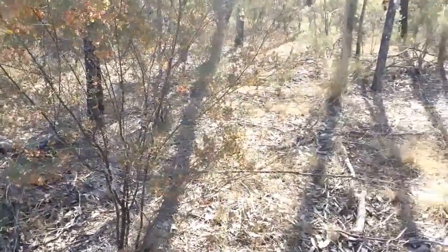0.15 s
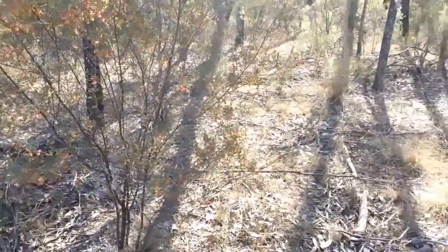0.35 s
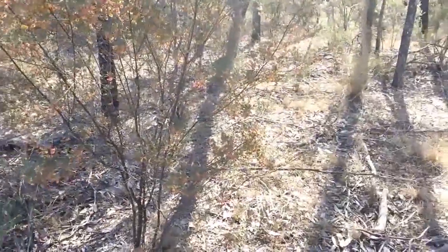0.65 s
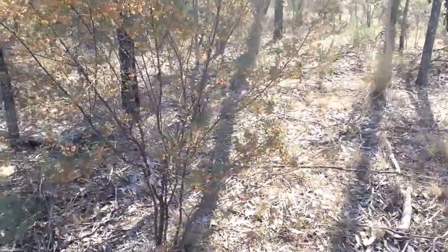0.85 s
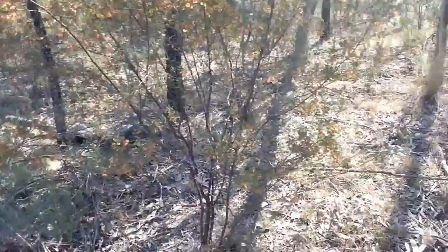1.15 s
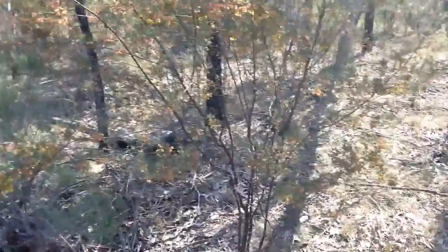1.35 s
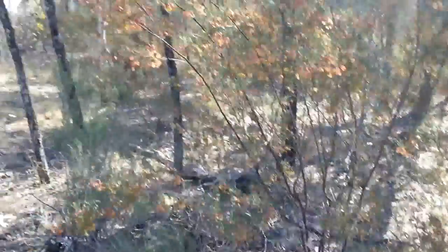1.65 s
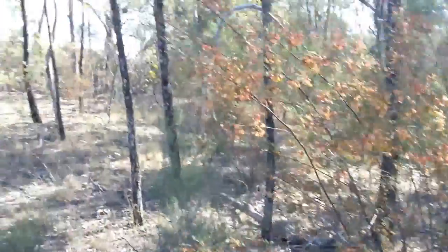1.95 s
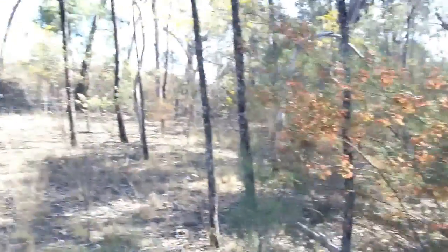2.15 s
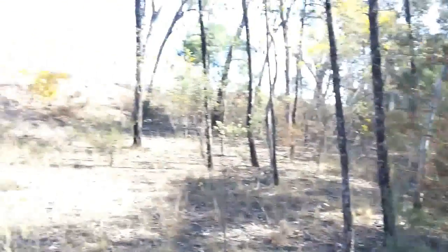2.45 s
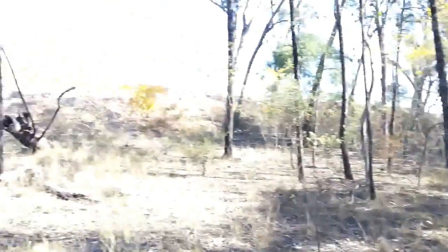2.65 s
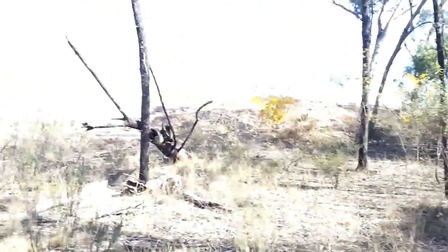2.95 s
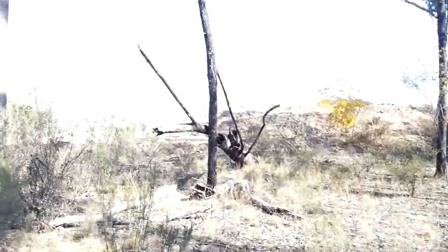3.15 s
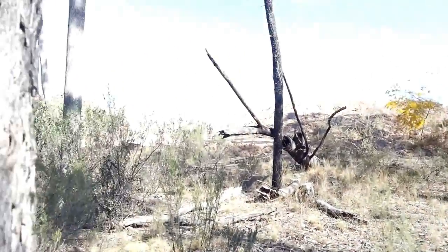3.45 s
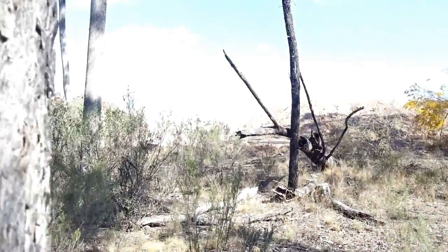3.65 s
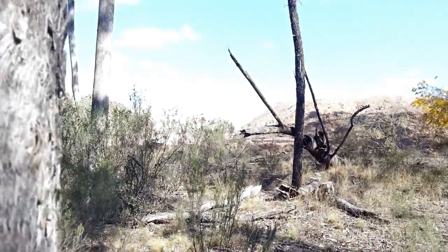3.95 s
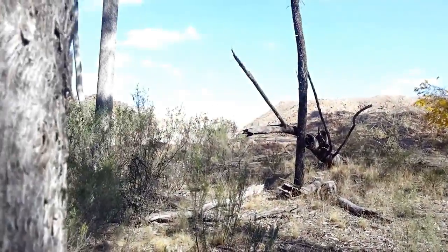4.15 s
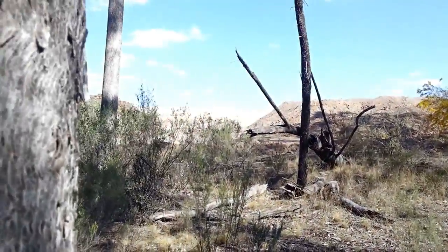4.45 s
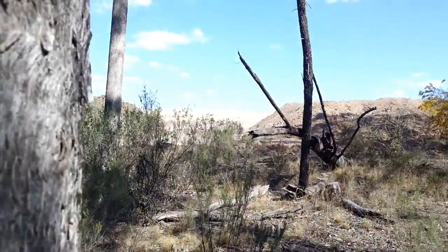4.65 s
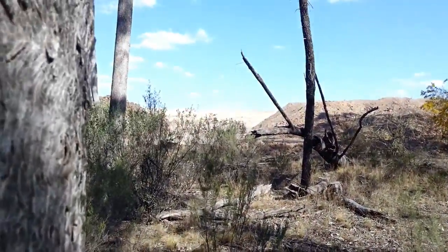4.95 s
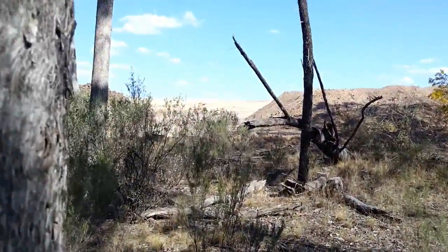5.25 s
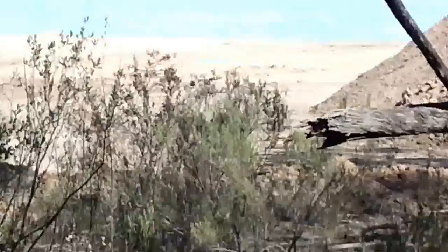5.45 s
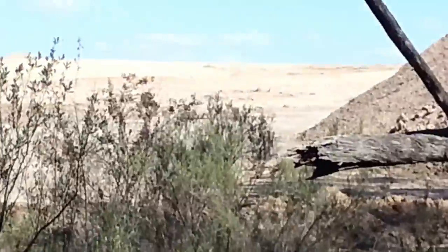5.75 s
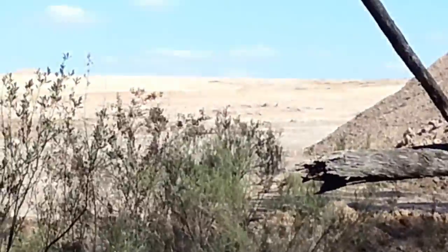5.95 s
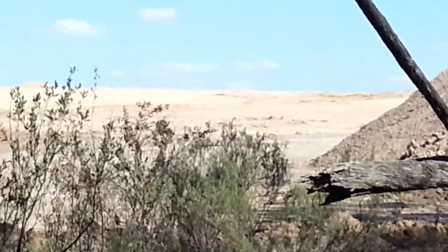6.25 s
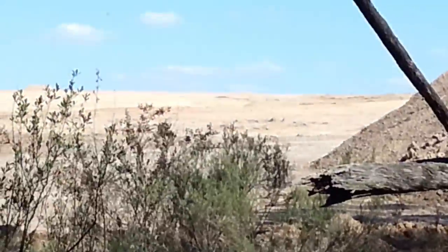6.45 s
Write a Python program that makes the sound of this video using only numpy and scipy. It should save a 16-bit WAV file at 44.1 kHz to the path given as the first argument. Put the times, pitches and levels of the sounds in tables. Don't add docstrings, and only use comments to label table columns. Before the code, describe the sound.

Small birds whistle and chirp in quiet dry woodland while someone a few steps away crunches through leaf litter, snapping twigs and sticks, then stops.

```python
import sys
import numpy as np
from scipy import signal
from scipy.fft import rfft, irfft, next_fast_len
from scipy.io import wavfile
from scipy.ndimage import uniform_filter1d, map_coordinates

SR = 44100
rng = np.random.default_rng(int(sys.argv[2]) if len(sys.argv) > 2 else 0)


def file_out(sig):
    cols = np.atleast_2d(sig).T
    lim = np.clip(cols, -1, 1)
    pcm = np.round(lim * 32767).astype(np.int16)
    wavfile.write(sys.argv[1], SR, pcm)


def how_loud(loudness_db):
    steps = np.asarray(loudness_db, float) / 20
    return 10 ** steps


N = 290619


def unit(x):
    return x / np.sqrt(np.mean(x ** 2) + 1e-20)


def along(points, hz):
    point_hz, value = np.transpose(points)
    return np.interp(np.log(hz + 1), np.log(point_hz + 1), value)


def curves(rows):
    s, *columns = np.transpose(rows)
    return [np.interp(np.arange(N) / SR, s, column) for column in columns]


def wobble(rate, size=N):
    knots = rng.standard_normal(int(size * rate / SR) + 4)
    return map_coordinates(knots, [np.arange(size) * rate / SR])


def filtered(x, response):
    m = next_fast_len(x.shape[-1] + 8192)
    spectrum = rfft(x, m) * response(np.fft.rfftfreq(m, 1 / SR))
    return irfft(spectrum, m)[..., :x.shape[-1]]


def resonance(hz, width_hz):
    return lambda f: 1j * f * width_hz / (hz * hz - f * f + 1j * f * width_hz)


# start_s, delay_ms
REACH = [(0, .25), (3, .25), (3.5, .41)]


def add(out, s, sound, pan_db, spacing=0):
    reach = np.interp(s, *np.transpose(REACH))
    lag = round(np.clip(-pan_db * spacing, -reach, reach) * SR / 1000)
    waves = np.broadcast_to(sound, (2, sound.shape[-1]))
    for side, wave, db, late in zip(out, waves, (pan_db / 2, -pan_db / 2), (lag, 0)):
        part = side[round(s * SR) + late:][:len(wave)]
        part += how_loud(db) * wave[:len(part)]


# start_s, lag_ms
TURN = [(0, -0.25), (1.2, -0.34), (2.6, -0.17), (3.7, 0.18), (4.2, 0.333), (6.6, 0.3)]


def far(x):
    lag = curves(TURN)[0] * SR / 1000
    left = map_coordinates(x[0], [np.arange(N) - lag], mode="nearest")
    return np.array([left, x[1]])


# pitch_hz, t60_s
TREES = [(500, 1), (3000, 0.62), (10000, 0.78)]


def trees(x, start_s):
    hz, t, z = signal.stft(rng.standard_normal((2, SR // 2)), SR, nperseg=256)
    decay = how_loud(-60 * t / along(TREES, hz)[:, None])
    tail = signal.istft(z * decay, SR, nperseg=256)[1]
    late = np.pad(x.mean(0), (round(start_s * SR), 0))[None]
    return signal.fftconvolve(late, tail / np.linalg.norm(tail[0]), axes=1)[:, :N]


# pitch_hz, level_db per Hz
AIR = [(15, -57), (25, -33.5), (175, -14.5), (240, -10.5), (314, -7), (443, -2.5), (480, -1.5),
       (1290, -1.5), (1390, -3), (1870, -0.5), (3260, -4), (4870, -10), (6520, -15.5), (14500, -17)]
# pitch_hz, likeness
ALIKE = [(60, 0.036), (300, 0.32), (700, 0.6), (1500, 0.487), (3000, 0.036), (7000, 0.019)]
AIR_DB = -49


def air(patchy_db):
    z = signal.stft(rng.standard_normal((2, N)), nperseg=512)[2]
    field = uniform_filter1d(rng.standard_normal(z.shape[1:]), 6, 0)
    field = uniform_filter1d(field, 12, 1)
    pair = signal.istft(z * how_loud(patchy_db * unit(field)), nperseg=512)[1][:, :N]

    def spectrum(hz):
        angle = np.arccos(np.clip(along(ALIKE, hz), -1, 1)) / 2
        return how_loud(along(AIR, hz)) * [np.cos(angle), np.sin(angle)]

    mid, side = filtered(pair, spectrum)
    return how_loud(AIR_DB + 0.69 * wobble(2.5)) * unit(np.array([mid + side, mid - side]))


# start_s, length_s, top_hz, end_drop_hz, level_db
WARBLES = [(0.274, 0.055, 3216, 898.5, -56), (0.325, 0.033, 3050, 496, -65),
           (0.599, 0.054, 3147, 804.3, -59), (0.789, 0.053, 2200, 301.6, -60),
           (0.981, 0.061, 3144, 805, -57.5), (1.092, .045, 2800, 400, -64), (1.19, 0.035, 2612, 500, -59),
           (1.307, 0.0542, 2636, 600, -57.5), (1.647, 0.0572, 2802, 402, -58),
           (2.825, 0.038, 3860, 500, -53), (3.12, 0.063, 3420, 700, -53), (3.429, 0.056, 3294, 393, -49),
           (3.7, 0.047, 3736, 600, -55), (3.745, 0.041, 3288, 498, -54), (3.796, 0.043, 3360, 497, -58),
           (3.841, 0.045, 3310, 496, -51), (3.883, .05, 3280, 400, -62), (4.267, 0.0268, 3750, 403, -63),
           (4.29, 0.0477, 3510, 700, -55.5), (4.339, 0.0464, 3400, 502, -60),
           (6.145, 0.037, 3283, 500, -64), (6.185, 0.0473, 3370, 504.4, -63),
           (6.25, 0.0515, 3107, 400, -65), (1.53, .04, 2650, 302, -61)]
WARBLER_PAN_DB = 7.5


def warbles(shake_hz):
    out = np.zeros((2, N))
    for s, length, top_hz, drop_hz, db in WARBLES:
        u = np.linspace(0, 1, round(length * SR))
        arch = np.where(u < .4, 1 - u / .4, (u - .4) / .6) ** 1.3
        hz = top_hz - drop_hz * arch + shake_hz * wobble(379.6, size=len(u))
        flutter = np.array([wobble(213, size=len(u)) for side in out])
        swell = np.sin(np.pi * u) ** 0.051 * how_loud(db + 7.0 + 2.5 * flutter)
        add(out, s, swell * np.sin(2 * np.pi * np.cumsum(hz) / SR), WARBLER_PAN_DB)
    return out


def glide(hz, db, flutter_db):
    level = how_loud(db + flutter_db * wobble(130))
    fluttering_hz = hz + 8 * flutter_db * wobble(81)
    return level * np.sin(2 * np.pi * np.cumsum(fluttering_hz) / SR)


# start_s, length_s, level_db
THIN = [(3.544, .078, -62.5), (3.703, 0.0203, -55), (3.764, 0.025, -67), (3.834, .03, -55),
        (3.968, 0.046, -57), (4.133, 0.046, -60.5), (4.285, 0.046, -54.5), (4.447, 0.055, -55.5),
        (4.655, 0.07, -63), (4.786, 0.086, -60.5), (4.988, 0.061, -51.5), (5.215, 0.085, -54),
        (5.33, 0.084, -63), (5.495, 0.13, -63), (5.66, 0.096, -64.5), (5.783, 0.14, -59.5),
        (6.083, 0.104, -65)]
# start_s, pitch_hz
THIN_HZ = [(3.3, 4200), (4.3, 4170), (4.5, 4040), (5.25, 3930), (5.75, 3850), (5.775, 3600), (6.2, 3590)]
THIN_HOLD_DB, THIN_EDGE_S, THIN_SAG_HZ = -67.5, 0.018, 30


def thin():
    t = np.arange(N) / SR
    gain = how_loud(THIN_HOLD_DB) * ((t > THIN_HZ[0][0]) & (t < THIN_HZ[-1][0]))
    droop = np.zeros(N)
    for s, length, db in THIN:
        on = (t > s) & (t < s + length)
        gain = np.maximum(gain, how_loud(db) * on)
        droop = droop + on * ((t - s) / length - .5)
    soft = lambda x: uniform_filter1d(x, max(round(THIN_EDGE_S * SR), 1))
    hz = curves(THIN_HZ)[0] - THIN_SAG_HZ * soft(droop)
    return soft(gain) * glide(hz, 0, flutter_db=3.5) * how_loud([[.75], [-.75]])


def whistles(rows, last_over_first, spacing=.085, flutter_db=2.3):
    out = np.zeros((2, N))
    for s, length, first_hz, db, pan_db in rows:
        last_hz = first_hz * last_over_first
        u = np.linspace(0, 1, round(length * SR))
        hz = first_hz + (last_hz - first_hz) * (1 - (1 - u) ** 1.457)
        hz = hz + 8 * flutter_db * wobble(94, size=len(u))
        swell = np.sin(np.pi * u) ** 0.4 * how_loud(db + 8.5 + flutter_db * wobble(135, size=len(u)))
        add(out, s - 0.09 * length, swell * np.sin(2 * np.pi * np.cumsum(hz) / SR), pan_db, spacing)
    return out


# start_s, length_s, first_hz, level_db, left_right_db
DOWNSLURS = [(.98, 0.047, 1700, -58, -6), (1.04, 0.058, 2300, -55, -1.5), (1.25, 0.071, 1600, -62.5, -7),
             (1.742, 0.08, 1726, -55.5, -1.5), (1.972, 0.034, 2150, -52, -2),
             (2.424, 0.05, 2100, -48, -9.5), (2.655, 0.0449, 2130, -46.5, -7), (3.13, 0.0285, 1940, -52, 4),
             (3.652, 0.0537, 2072, -53.5, 6.5), (3.75, .022, 2900, -57, -0.5), (3.85, .043, 2088, -53, 6),
             (4.511, 0.064, 1847, -61.5, -4.5), (4.859, 0.024, 2327, -51.5, -6),
             (5.172, 0.032, 2240, -52.5, -9), (5.832, .05, 1980, -54, -3), (6.268, 0.034, 1790, -58.5, 4)]


def downslurs():
    return whistles(DOWNSLURS, last_over_first=.78)


# start_s, length_s, first_hz, level_db, left_right_db
UPSLURS = [(1.098, 0.0274, 2510, -63, 1), (1.437, .04, 2525, -57, -0.5), (2.862, 0.024, 3294, -55, 12),
           (3.724, 0.058, 1690, -62, -1.5), (4.92, .03, 1820, -70.5, 0), (4.957, 0.063, 2267, -68.5, 17.5),
           (5.331, 0.0435, 2070, -58.5, -8), (5.465, 0.027, 3600, -60, 9), (5.79, 0.016, 1864, -53, -10),
           (6.108, .03, 1700, -62, 4.5), (6.097, 0.055, 5200, -70, 2), (6.113, 0.0257, 3560, -58.5, -1),
           (6.35, 0.064, 1520, -50, 4), (6.41, 0.029, 1788, -51.5, -4.5)]


def upslurs():
    return whistles(UPSLURS, last_over_first=1.075)


# start_s, length_s, pitch_hz, level_db, left_right_db
PIPES = [(.055, 0.063, 4900, -63, 1.5), (.175, 0.047, 4850, -68, 1.5), (.243, 0.034, 3570, -66.5, 5.5),
         (.34, 0.041, 2910, -57.5, 3), (1.27, 0.039, 2850, -64, .5), (1.26, 0.063, 2140, -60, 1.5),
         (1.324, 0.078, 2300, -56, 1), (2.554, 0.031, 4280, -62, 16), (2.813, .024, 3340, -64, 7),
         (4.445, 0.038, 1830, -63, -1.5), (4.655, .025, 2260, -63, 0), (4.736, .03, 2190, -66, 6),
         (5.23, .024, 2270, -58, 3.5), (5.393, 0.0204, 2230, -60, 3), (5.62, 0.07, 3170, -61.5, 2),
         (5.71, .04, 1511, -60, 4.5), (5.808, 0.03, 2000, -57.5, -8), (5.55, .03, 3040, -64, 0.5),
         (1.115, 0.0183, 2750, -61, 0.5), (2.505, 0.0278, 3420, -56.5, -0.5), (2.555, 0.0307, 2095, -57, 0),
         (6.135, 0.032, 4300, -58, -4), (6.215, 0.02, 2936, -57, 1), (6.42, 0.045, 3840, -57, -4),
         (6.412, 0.043, 5720, -70.5, 1.5)]


def pipes():
    return whistles(PIPES, last_over_first=0.98)


def sweep(rows, lead_s=0):
    t = np.arange(N) / SR
    hz, db, pan_db = curves(rows)
    tone = glide(hz, db, flutter_db=1.0) * ((t > rows[0][0]) & (t < rows[-1][0]))
    right = np.roll(tone, round(lead_s * SR))
    return np.array([tone * how_loud(pan_db / 2), right * how_loud(-pan_db / 2)])


# start_s, pitch_hz, level_db, left_right_db
TUMBLE = [
    (.572, 3560, -56, 6),
    (.58, 3500, -47, 6),
    (.592, 3300, -56, 3),
    (.622, 2910, -43, 8),
    (.655, 2560, -48, 6),
    (.69, 1950, -53, -4),
    (.718, 1450, -49, -4),
    (.744, 1270, -55, -2),
    (.775, 1340, -50, -2),
    (.783, 1340, -66, -2),
]


def tumble():
    return sweep(TUMBLE, lead_s=.00021)


# start_s, pitch_hz, level_db, left_right_db
ARCH = [
    (6.46, 4550, -54, -6.5),
    (6.466, 4850, -49, -6.5),
    (6.474, 4930, -48, -6.5),
    (6.482, 4850, -50, -6.5),
    (6.489, 4520, -58, -6.5),
]


def arched_chirp():
    return sweep(ARCH)


# start_s, effort_db
SHUFFLE = [
    (1.3, -90),
    (1.55, -52.5),
    (1.8, -50),
    (2.15, -47),
    (2.55, -47.5),
    (2.75, -57.5),
    (3.2, -48),
    (3.8, -54),
    (4.05, -65),
    (4.68, -72),
]
# peak_s, fade_s, load_db, dryness_db (more hiss, less crunch)
TREADS = [(1.456, 0.0055, -53, 11), (1.89, 0.037, -46, 2), (1.97, 0.056, -59, 18.5),
          (2.035, 0.025, -44, -10), (2.18, 0.052, -54, 14), (2.29, .03, -58, 18), (2.39, 0.037, -60, 14.5),
          (2.6, 0.03, -51, -4), (2.928, 0.0728, -41.5, 10), (3.074, 0.025, -43.5, 8.5),
          (3.1, 0.022, -41, 10), (3.133, .035, -42.5, 8.5), (3.185, .02, -48, 5), (3.21, 0.026, -48.5, -12),
          (3.31, 0.018, -47.5, 11.5), (3.44, 0.041, -50, 7.5), (4.29, 0.092, -53, 4.5),
          (4.53, 0.123, -56.5, 7.5)]
PRESS_S = 0.0235


def load(shuffle_db, tread_db, dry_share):
    t = np.arange(0, N / SR, .001)
    power = how_loud(np.interp(t, *np.transpose(SHUFFLE)) + shuffle_db) ** 2
    for s, fade, db, dryness in TREADS:
        width = np.where(t < s, PRESS_S, fade)
        power = power + how_loud(2 * (db + tread_db + dry_share * dryness)) * np.exp(-((t - s) / width) ** 2)
    return np.interp(np.arange(N) / SR, t, np.sqrt(power))


# over_shuffle_db, over_load_db, share_of_dryness
LAYERS = [
    (-8.5, -2.5, -0.089),
    (-1.5, -1.5, -0.11),
    (-15, -15, 0.73),
    (-12, -14.5, 0.99),
]
LITTER_HZ = [700, 2500, 5000, 9000]
BED = (.75, .78, .7, .88)
LITTER_PAN_DB = [-0.68, 0.017, 1.8, -2.5]
LITTER_SPREAD = [1.9, 1.26, .9, 1.4]


def litter(count, spiky_db, cycles):
    out, t = np.zeros((2, N)), np.arange(200) / SR
    first, last = SHUFFLE[0][0], SHUFFLE[-1][0]
    edge = curves([(first, 0), (first + 0.074, 1), (last - .1, 1), (last, 0)])[0]
    clumps = how_loud(1.4 * wobble(70))
    likeness = (.8, .45, 0.074, 0.037)
    layers = zip(LITTER_HZ, LAYERS, likeness, BED, LITTER_PAN_DB, LITTER_SPREAD)
    for hz, layer, alike, bed, pan_db, spread in layers:
        when, tune, size, place, sign = rng.random((count, 5)).T
        start = ((first + when * (last - first)) * SR).astype(int)
        pitch = np.minimum(hz * 2 ** (1.57 * (tune - .5)), 14500)[:, None]
        grain = how_loud(-spiky_db * np.log(size + 0.014))[:, None]
        grain = grain * how_loud(-20 * t * pitch / cycles) * (1 - t / t[-1])
        grain = grain * np.sin(2 * np.pi * pitch * t) * np.sign(sign - .5)[:, None]
        sides = [place < (1 + alike) / 2, place > (1 - alike) / 2]
        at = (start[:, None] + np.arange(len(t))).ravel()
        crackle = np.array([np.bincount(at, (grain * side[:, None]).ravel(), N)[:N] for side in sides])
        shared, own = rng.standard_normal(N), rng.standard_normal((2, N))
        fine = alike * shared + np.sqrt(1 - alike ** 2) * own
        fine = filtered(fine, lambda f: resonance(hz, spread * hz)(f) ** 2)
        mix = 1.17 * unit(crackle) * np.sqrt(1 - bed ** 2) + bed * unit(fine)
        out += how_loud([[pan_db / 2], [-pan_db / 2]]) * load(*layer) * edge * clumps * mix
    return out


KNOCK_LAG_S = 0.00087


def snap(out, s, db, knock_db, sizzle_db, pan_db, hz, cycles, noisy):
    t = np.arange(SR // 40) / SR
    rise = 1 - np.exp(-t / .0002)
    shared, own = rng.standard_normal(len(t)), rng.standard_normal((2, len(t)))
    burst = rise * how_loud(-60 * t / .004) * (.75 * shared + .66 * own)
    ring = rise * how_loud(-60 * t * hz / cycles) * np.sin(2 * np.pi * hz * t)
    body = lambda f: resonance(np.sqrt(hz * 3000), 3200)(f) * resonance(2600, 4200)(f) ** 2
    crack = noisy * filtered(burst, body)
    sizzle = filtered(own * rise * how_loud(-60 * t / 0.0032), lambda f: resonance(7200, 6500)(f) ** 2)
    knock_hz = 814 - 24 * max(knock_db, 0)
    late = np.maximum(t - KNOCK_LAG_S, 0)
    thump = how_loud(-60 * late / 0.0046) * (1 - np.exp(-late / 0.0012))
    knock = -thump * np.sin(2 * np.pi * knock_hz * late)
    parts = (ring + crack, .3), (sizzle, sizzle_db + 6.0), (knock, knock_db + 0.5)
    total = sum(how_loud(db + level_db) * part / abs(part).max() for part, level_db in parts)
    add(out, s - .0002, total, pan_db)


def ring_cycles(hz):
    return 5.6 + hz / 300


TWIG_SIZZLE_DB = -23

# start_s, crack_db, ring_hz, left_right_db
TWIGS = [(1.452, -35.5, 3950, 16), (1.654, -35, 2300, -2), (1.973, -35, 2540, -1), (2.006, -31.5, 3600, 1),
         (2.285, -33, 5140, 3.5), (2.293, -36.5, 1900, -2), (2.3, -32.5, 5230, 1), (2.389, -35, 5100, 6.5),
         (2.453, -44, 3530, 0), (2.514, -38, 3580, 2.5), (2.555, -35, 2090, 0), (2.671, -37.5, 3500, -2),
         (2.9257, -30, 3690, -1), (2.9262, -28, 1290, -1), (2.946, -29, 3000, -1.5),
         (3.151, -27.5, 4200, 0), (2.3602, -35.5, 2200, 0), (2.2654, -35.5, 1900, 0),
         (2.238, -33, 6500, -1.5), (2.475, -35.5, 5000, 2), (1.885, -30, 3600, 0), (1.8716, -35.5, 5000, 2),
         (3.0845, -31, 6600, -4), (3.1732, -31, 5450, -2), (3.2326, -22, 3300, -2), (3.456, -36, 8500, 0),
         (3.518, -35, 7720, -3), (3.668, -46, 4000, 0), (1.565, -27, 2660, 2), (1.6233, -35, 3900, 2.5),
         (1.6847, -33.5, 2500, -8), (1.7947, -18.5, 1920, -2.5), (1.8473, -19, 2160, -4),
         (1.8775, -24, 2080, -2.5), (1.899, -28.5, 5000, 2), (1.9313, -31, 2730, -1),
         (1.9501, -26, 5070, 4.5), (3.2311, -20, 5160, 10), (3.4194, -23, 2400, -5), (3.4185, -19, 4270, 7),
         (2.108, -28, 3370, 2), (2.1095, -31.5, 4200, 0), (2.173, -29, 6000, 0), (3.482, -28, 3000, 0),
         (2.2355, -26, 2650, 2), (2.3224, -32, 2665, -5), (2.7137, -29, 1800, -2), (2.845, -37, 4100, 5),
         (2.9218, -23, 2066, -2), (3.0085, -21, 2260, -2), (3.5474, -39, 3100, 2), (3.8361, -25.5, 3810, 9),
         (3.8365, -24, 1750, -3.5), (4.4818, -32.5, 3600, 17), (4.511, -36, 2180, 11)]


def twigs():
    out = np.zeros((2, N))
    for s, db, hz, pan_db in TWIGS:
        snap(out, s, db, -13.5, TWIG_SIZZLE_DB, pan_db, hz, ring_cycles(hz), noisy=2.4)
    return out


# start_s, crack_db, ring_hz, left_right_db
POPS = [(2.0554, -15, 2100, 1), (2.1868, -22, 2050, -3), (2.1341, -24.5, 3200, -3), (1.9868, -25, 4600, 2),
        (3.2354, -16.5, 1560, -7), (3.4667, -22.5, 2000, 0), (2.045, -28, 2300, -3), (2.089, -32, 2500, 0),
        (1.9, -34, 3500, 0), (2.1245, -34, 5000, 0), (1.9665, -36, 5200, 0), (2.018, -32, 5000, 0),
        (3.2314, -24, 1160, 0), (3.4808, -21, 1220, 0), (3.4848, -28, 2800, 0), (3.4918, -32, 1500, 0),
        (3.0775, -28, 1700, 0), (3.1435, -29, 1900, 0), (2.4, -34, 2600, 0), (2.9555, -33, 820, 0)]


def pops():
    out = np.zeros((2, N))
    for s, db, hz, pan_db in POPS:
        snap(out, s, db, -17, TWIG_SIZZLE_DB, pan_db, hz, cycles=4.3, noisy=0.65)
    return out


# start_s, crack_db, ring_hz, sizzle_over_crack_db, knock_over_crack_db
SPLINTERS = [(1.862, -24.5, 2500, -15.5, -27), (1.9966, -27.5, 1920, -8.5, -19),
             (2.1709, -25.5, 3320, -4.5, -23), (2.2149, -27, 1920, -12.5, -26),
             (2.3489, -22.5, 1665, -12.5, -18), (2.4747, -40, 1730, -5, -11),
             (2.6033, -31.5, 3130, -1.5, -5), (2.98, -38, 2750, 1, -17.5), (3.0992, -32.5, 3620, 0, 9.5),
             (3.113, -26, 3630, -3, -12), (3.1278, -30, 3030, -3, -10), (3.231, -14.5, 3600, -8, -17),
             (3.3077, -24, 3440, -8, -7.5), (3.4185, -18.5, 4770, -2.5, 3.5), (3.4806, -18, 2300, -5, -4),
             (3.5814, -38, 3530, 7.5, -16), (3.6923, -31, 1780, -6, -11.5), (3.968, -38.5, 2546, -3, -5),
             (5.3071, -36.5, 3870, -3.5, -6)]


def splinters():
    out = np.zeros((2, N))
    for s, db, hz, sizzle_db, knock_db in SPLINTERS:
        snap(out, s, db, knock_db, sizzle_db, -1, hz, ring_cycles(hz), noisy=2.6)
    return out


# start_s, crack_db, knock_over_crack_db, left_right_db
STICKS = [(1.8805, -20.5, -16, -0.5), (2.0256, -19.5, -7.5, 0), (2.0554, -38, -2.5, 0),
          (2.2513, -21, -31, 1), (2.3176, -25, -14, 1), (3.2005, -24.5, -13, 0.5), (2.918, -33, 1, 0),
          (2.948, -38, 4, -1), (2.991, -41.5, -6.5, -1), (3.047, -42, 15, 0), (3.0522, -37, 7.5, 0),
          (3.074, -30, -10, 0), (3.130, -43, 15, -1), (3.166, -34, 0, 2), (3.191, -36, 2, 0),
          (3.2105, -41, 3, 0), (3.287, -38, 5, -3), (4.2909, -36, -9, -4), (1.9085, -36, -4, -2),
          (3.4897, -27.5, -8, 2), (3.4948, -29, -11, 2), (4.3706, -38.5, 0, 0), (4.698, -39, 15, -7),
          (5.2835, -44, 14, -7.5)]


def sticks():
    out = np.zeros((2, N))
    for s, db, knock_db, pan_db in STICKS:
        snap(out, s, db, knock_db, -27.5, pan_db, hz=1176, cycles=6.8, noisy=1.7)
    return out


def scene():
    hush = far(air(patchy_db=1.19))
    hidden = far(warbles(shake_hz=244.0))
    clear = downslurs() + upslurs() + pipes() + tumble() + thin()
    birds = arched_chirp() + clear + how_loud(-2.5) * trees(clear, 0.012)
    birds = birds + hidden + how_loud(2.5) * trees(hidden, 0.0094)
    snaps = sticks() + twigs() + pops() + splinters()
    near = snaps + how_loud(-14.5) * trees(snaps, 0.0072) + litter(count=3000, spiky_db=2.0, cycles=2.2)
    small = filtered(near, lambda f: 1 / (1 + 330 / (1j * f + 1e-9)) ** 4)
    return hush + birds + small


def low_pass(x):
    return signal.sosfilt(signal.butter(12, 15640, fs=SR, output="sos"), x)


def record(dry):
    top_hz = 14650
    cut = filtered(dry, lambda f: np.where(f < top_hz, 1, how_loud(-40)))
    return low_pass(cut)


dry = scene()
out = record(dry)
file_out(out)
```